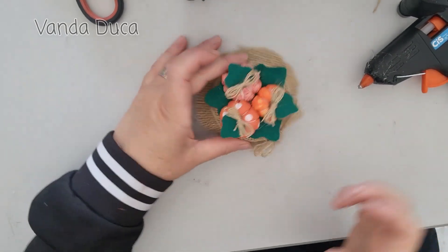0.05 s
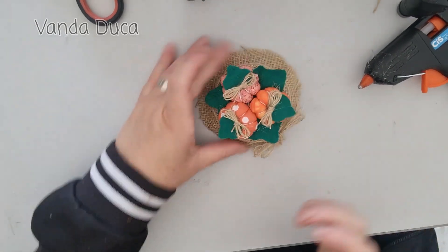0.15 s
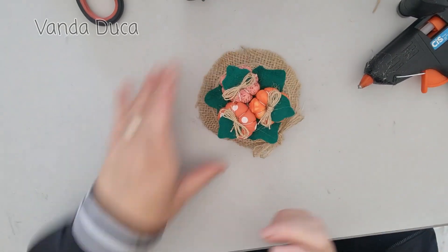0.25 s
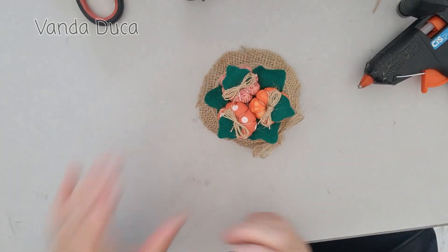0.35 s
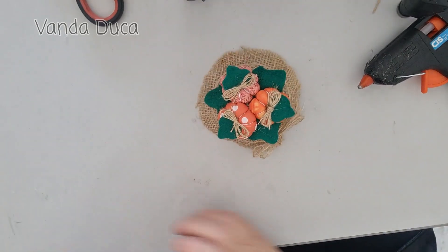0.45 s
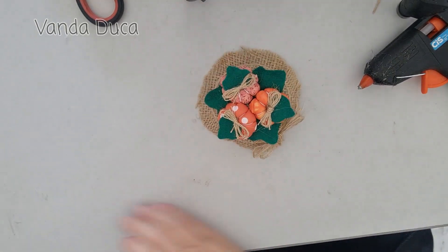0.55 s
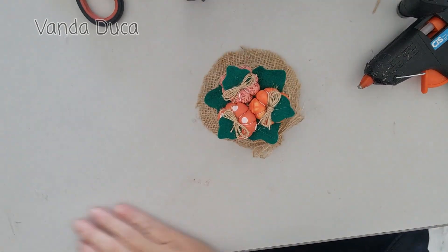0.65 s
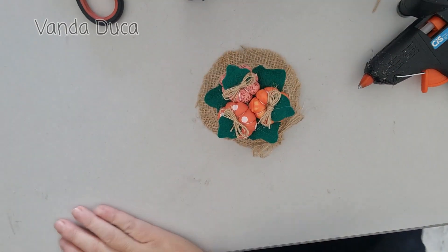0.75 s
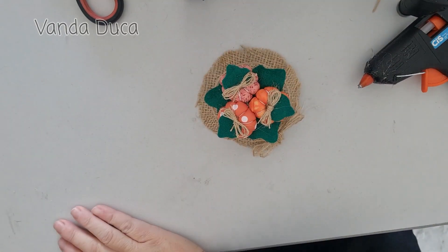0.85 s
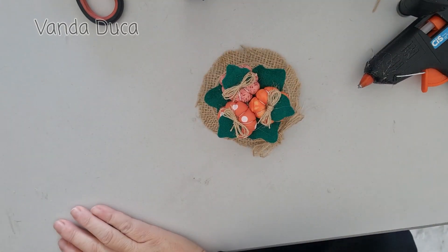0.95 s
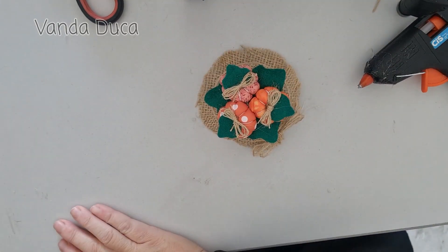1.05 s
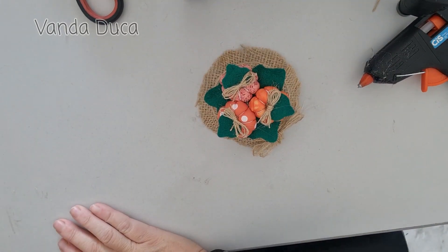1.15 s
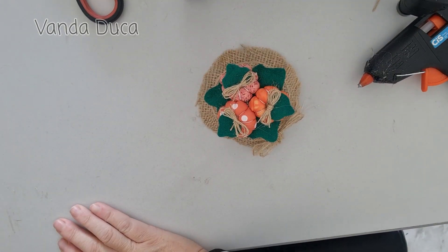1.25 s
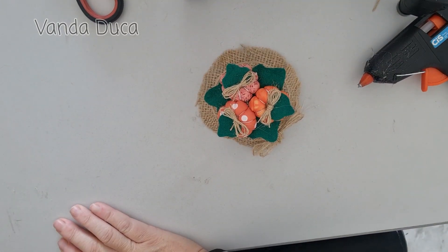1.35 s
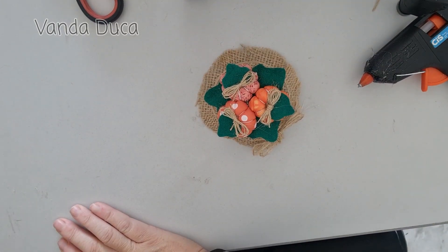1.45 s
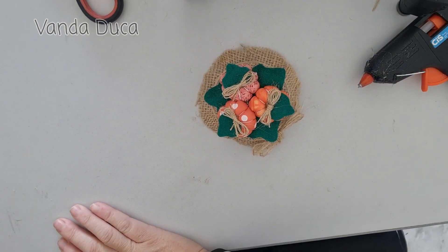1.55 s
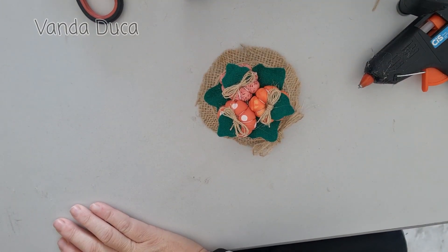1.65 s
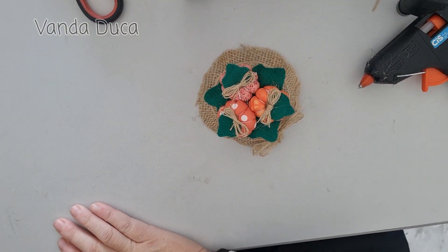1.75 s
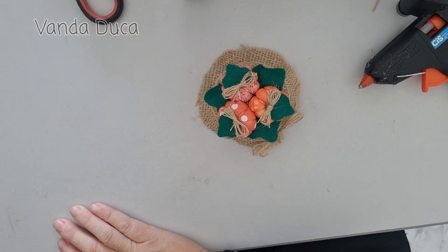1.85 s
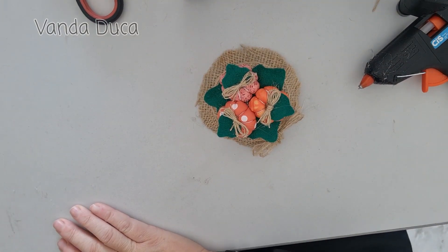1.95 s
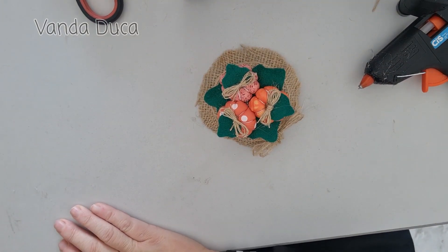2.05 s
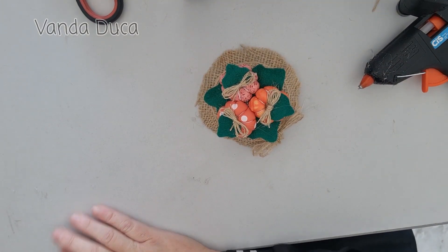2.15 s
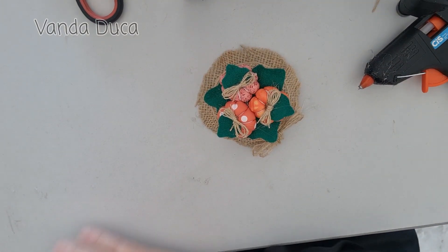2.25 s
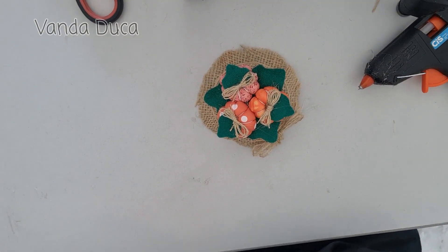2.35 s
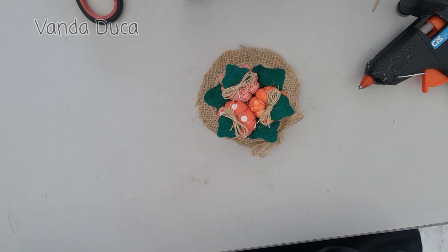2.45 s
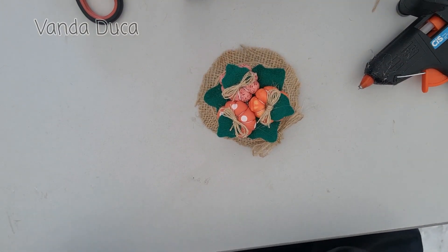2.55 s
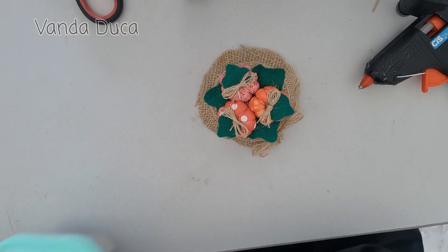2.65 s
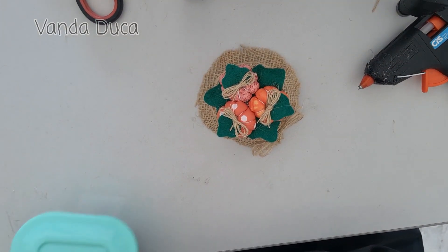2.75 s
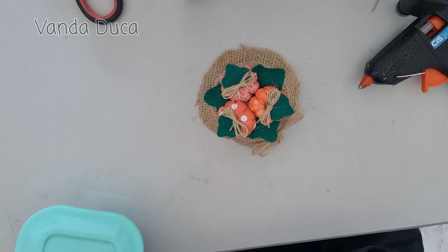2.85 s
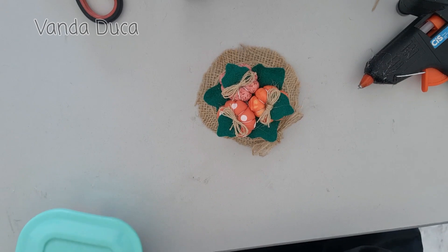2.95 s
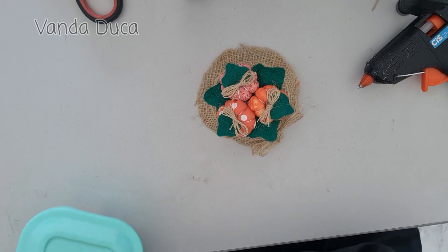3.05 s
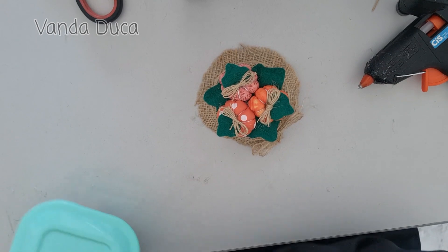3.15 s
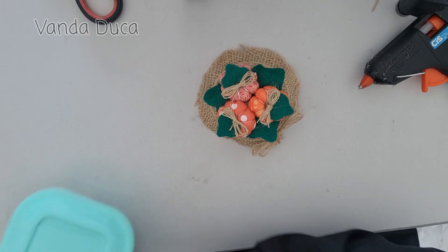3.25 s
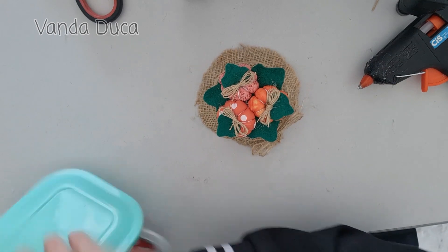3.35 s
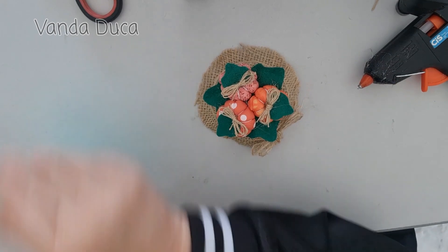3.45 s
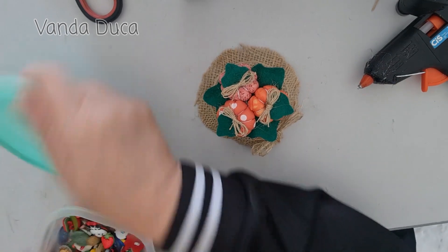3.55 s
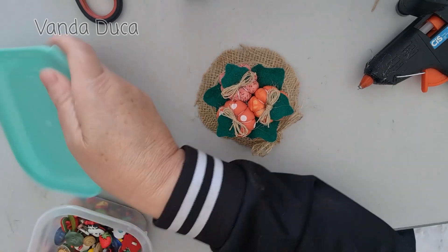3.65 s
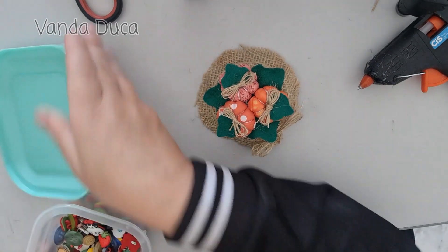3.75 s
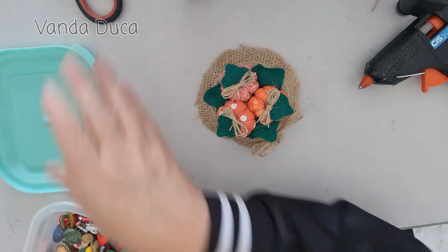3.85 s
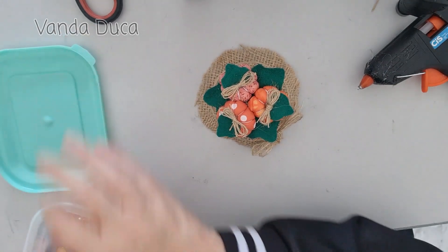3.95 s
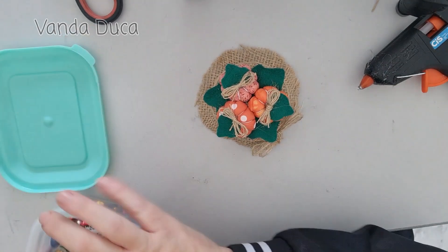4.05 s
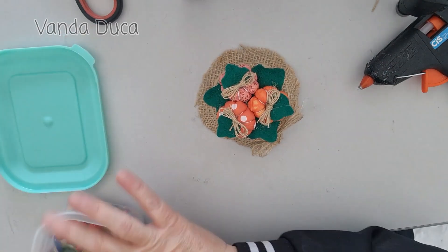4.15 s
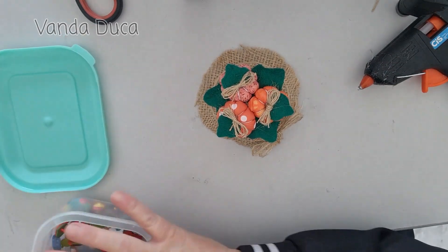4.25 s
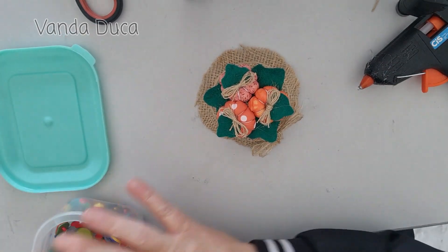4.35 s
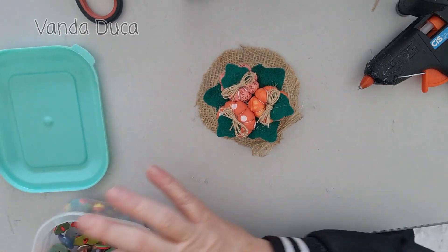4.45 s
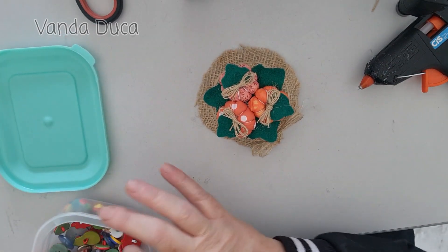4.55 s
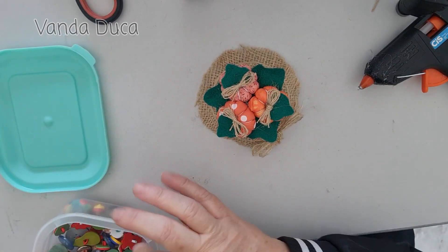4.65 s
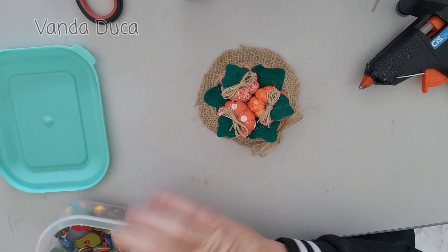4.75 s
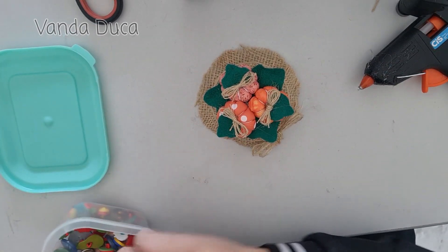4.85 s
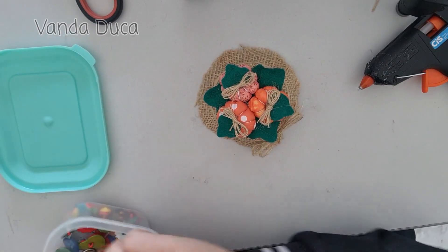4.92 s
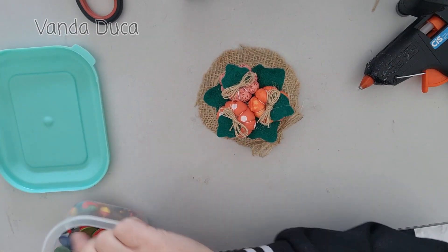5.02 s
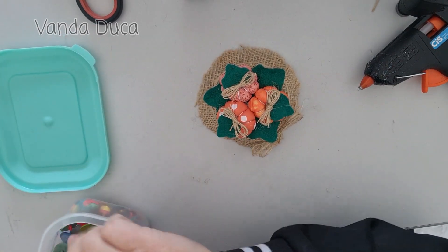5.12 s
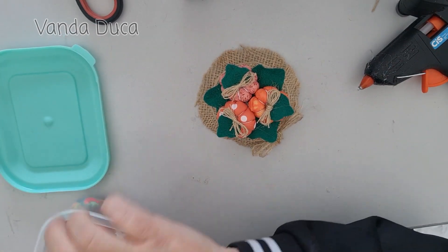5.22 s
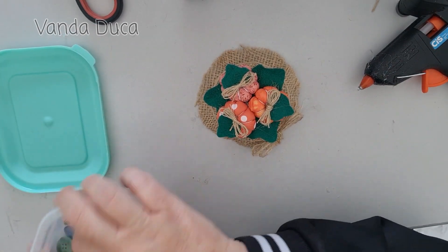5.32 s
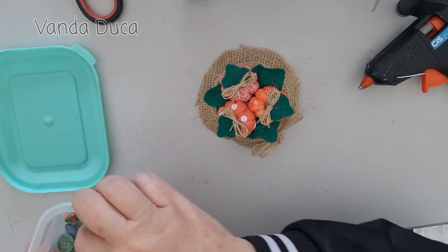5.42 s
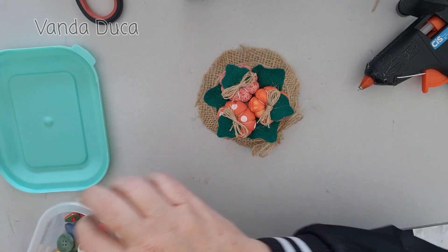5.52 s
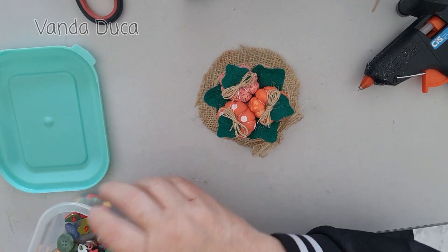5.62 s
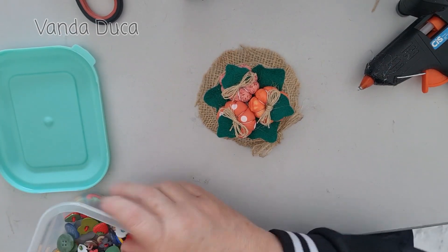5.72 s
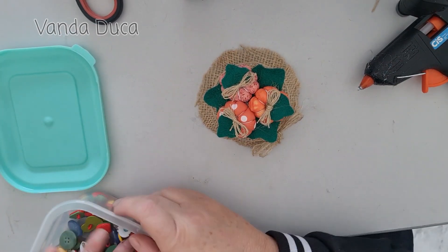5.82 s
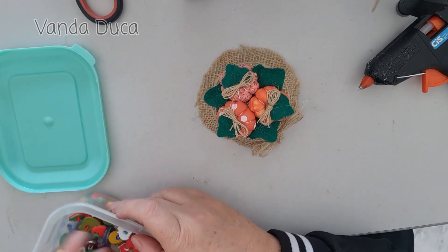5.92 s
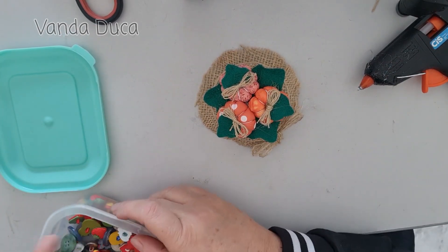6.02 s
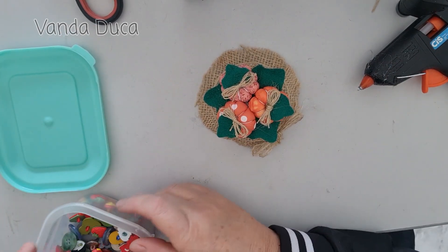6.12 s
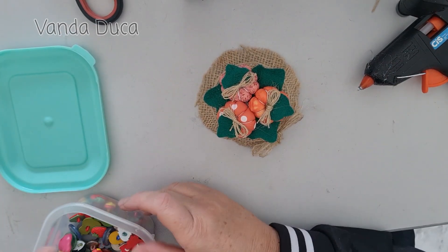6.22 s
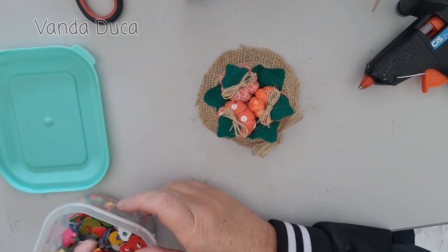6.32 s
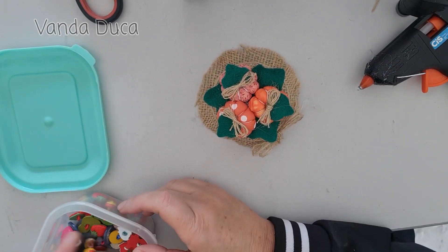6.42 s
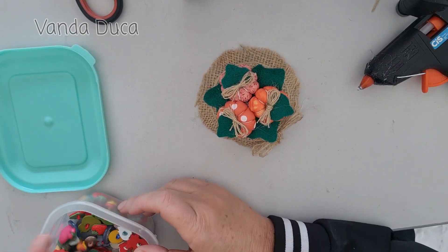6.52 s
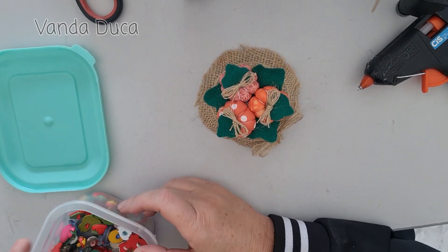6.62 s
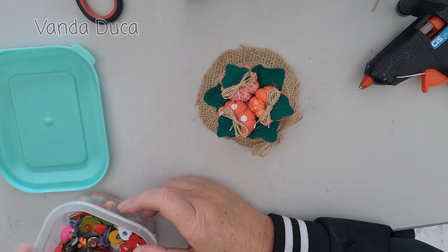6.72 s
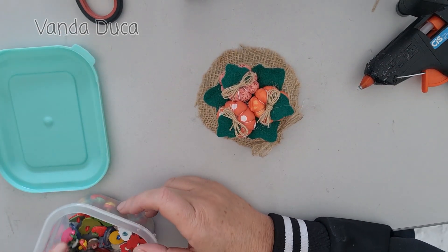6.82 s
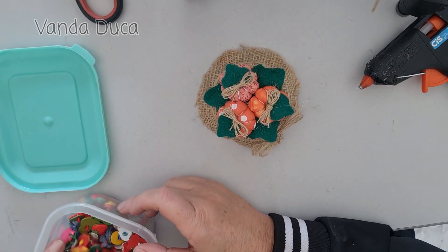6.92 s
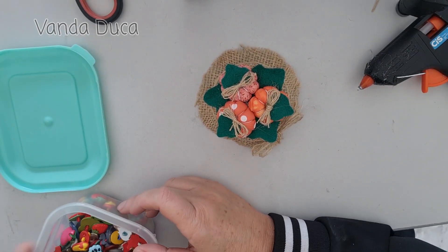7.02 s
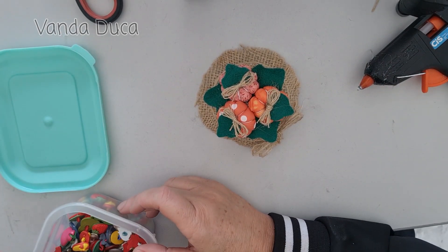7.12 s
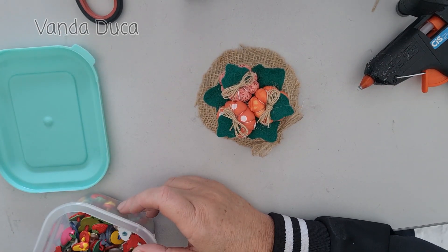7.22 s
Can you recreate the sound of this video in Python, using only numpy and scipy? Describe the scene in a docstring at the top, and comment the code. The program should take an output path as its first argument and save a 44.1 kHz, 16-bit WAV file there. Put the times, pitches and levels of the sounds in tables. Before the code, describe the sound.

Quiet room hum, then loose plastic buttons shift in a tub, the lid pops off loudly, and the buttons are stirred in bursts.

```python
"""Room noise and a distant traffic hum come first, then light far knocks and a sleeve brushing a table.
A plastic box of buttons is lifted, set down, and its tight lid pulled off and laid aside; fingers rummage.
Colliding buttons are random short decaying tones; snaps add a noise crack to a ring; the box is damped modes.
Hums and a low thud are wavering sines, cloth and room noise filtered noise; a small room answers by convolution."""
import sys
import numpy as np
from scipy import signal
from scipy.fft import rfft, irfft, next_fast_len
from scipy.io import wavfile
from scipy.ndimage import map_coordinates

SR = 44100
rng = np.random.default_rng(int(sys.argv[2]) if len(sys.argv) > 2 else 0)


def digitize_waveform(pressure):
    """Quantize a signal to 16-bit integers and store it at the path in sys.argv[1].

    Rows of a 2-D input are taken as channels; values are limited to [-1, 1].
    """
    field = np.atleast_2d(pressure).T
    bounded = np.clip(field, -1, 1)
    quanta = np.round(bounded * 32767).astype(np.int16)
    wavfile.write(sys.argv[1], SR, quanta)


N = 321048
TIME = np.arange(N) / SR
AGE = np.arange(SR // 4) / SR  # seconds since a strike


def amp(db):
    """Logarithmic level: decibels to amplitude gain."""
    return 10 ** (np.asarray(db) / 20)


def unit(x):
    """Power normalisation: scale to rms 1."""
    return x / np.sqrt(np.mean(x ** 2) + 1e-20)


def along(points, hz):
    """Logarithmic frequency scale: interpolate (frequency, value) points."""
    f, v = np.transpose(points)
    return np.interp(np.log(hz + 1), np.log(f + 1), v)


def wobble(rate, size=16384):
    """Slow random modulation: a smooth curve through rate random knots a second."""
    knots = rng.standard_normal(size)
    return map_coordinates(knots, [TIME * rate], order=2, mode="wrap")


def filtered(x, response):
    """Linear filtering: multiply the spectrum by a complex response of frequency."""
    m = next_fast_len(x.shape[-1] + SR // 4)
    spectrum = rfft(x, m) * response(np.fft.rfftfreq(m, 1 / SR))
    return irfft(spectrum, m)[..., :x.shape[-1]]


def coloured(x, points, size=2048):
    """Minimum-phase filtering: a causal response of given spectrum, so that attacks stay sharp."""
    cepstrum = irfft(np.log(amp(along(points, np.fft.rfftfreq(size, 1 / SR)))))
    # fold the cepstrum onto positive time
    cepstrum[1:size // 2] *= 2
    cepstrum[size // 2 + 1:] = 0
    kernel = irfft(np.exp(rfft(cepstrum)))
    kernel = kernel[None] / np.linalg.norm(kernel)
    return signal.oaconvolve(x, kernel, axes=1)[:, :x.shape[1]]


def add(track, s, sound):
    """Superposition: mix a sound in at time s."""
    part = track[:, round(s * SR):][:, :sound.shape[-1]]
    part += sound[..., :part.shape[1]]


def fade(t60):
    """Exponential damping: 60 dB lost in t60 seconds."""
    return np.exp(-np.log(1000) * AGE / t60)


def tone(hz):
    """Phase is the running sum of frequency: a sine of rms 1 on a steady or moving pitch."""
    phase = 2 * np.pi * np.cumsum(hz * np.ones(N)) / SR
    return np.sqrt(2) * np.sin(phase)


def ring(modes, scatter_db=-2.5):
    """Modal synthesis: damped modes of alternating sign, with levels scattered at each strike."""
    total = 0
    for k, (hz, db, t60) in enumerate(modes):
        level = amp(db + scatter_db * rng.normal())
        total = total + level * fade(t60) * np.sin(2 * np.pi * hz * AGE) * (-1) ** k
    return total


# room noise spectrum: pitch_hz [Hz], level_db [dB, relative]
QUIET_SPECTRUM = [(12, -25), (22, -2), (33, 3), (50, -6), (78, -0.5), (101, -6), (146, -5), (193, -6),
                  (228, -8), (301, -9.5), (328, -13), (422, -17), (459, -22.5), (513, -14.5), (1060, -22.5),
                  (3530, -30.5), (6300, -42), (16000, -53)]
# likeness of left and right noise: pitch_hz [Hz], correlation [0 to 1]
QUIET_LIKENESS = [(60, 0.88), (180, 0.96), (550, 0.52), (1650, 0.0014), (4970, 0), (15000, 0)]


def room_noise(level_db=-49):
    """Diffuse-field coherence: steady rumble and hiss, alike at both ears only at long wavelengths."""
    def mid_and_side(hz):
        turn = np.arccos(np.clip(along(QUIET_LIKENESS, hz), 0, 1)) / 2
        return amp(along(QUIET_SPECTRUM, hz)) * [np.cos(turn), np.sin(turn)]

    mid, side = filtered(rng.standard_normal((2, N)), mid_and_side)
    return amp(level_db) * unit(np.array([mid + side, mid - side]))


# faint high tones: start_s [s], end_s [s], mean pitch_hz [Hz], mean level_db [dB]
WHINE_TONES = [(0, 6.3, 8470, -93), (3.08, 3.37, 7200, -77)]


def whines():
    """Narrow-band tones: thin sines high in the hiss, unsteady in level and pitch."""
    total = 0
    for start, end, hz, db in WHINE_TONES:
        to_edge_s = np.minimum(TIME - start, end - TIME)
        heard = np.clip(to_edge_s / 0.05, 0, 1)
        level = amp(db + 2 * wobble(20))
        total = total + level * heard * tone(hz * (1 + 0.006 * wobble(160)))
    return total


# steady distant hums: mean pitch_hz [Hz], level_db [dB, before the common gain]
STEADY_HUMS = [(139.7, -60.5), (66.6, -56)]
# hums that swell and fade; the last two rows are a low thud and its second harmonic:
# peak_s [s], half_length_s [s], mean pitch_hz [Hz], glide_hz to either side [Hz],
# level_db at the peak [dB, before the common gain]
SWELLING_HUMS = [(0.348, 0.273, 150, 19, -54), (1.498, 0.3, 142.4, 7, -51), (4.85, 0.35, 292, 4, -57.5),
                 (5.78, 0.18, 222, -4, -51.5), (7.1, 0.2, 186, 1, -54), (7.25, 0.044, 141, 1, -47),
                 (7.27, 0.05, 70.4, 0.5, -34.5)]


def traffic(level_db=0.5, waver=0.01186, fading=0.7, fading_per_s=13):
    """Amplitude and frequency modulation: wavering, broken hums, steady or swelling, and a low thud."""
    def note(hz):
        broken = 1 + fading * wobble(fading_per_s)
        return broken * tone(hz * (1 + waver * wobble(25)))

    hum = sum(amp(db) * note(hz) for hz, db in STEADY_HUMS)
    for s, half_s, hz, glide_hz, db in SWELLING_HUMS:
        offset = (TIME - s) / half_s
        spread = np.hypot(1, offset)  # 1 at the peak, growing to either side
        hum = hum + amp(db) / spread * note(hz + glide_hz * offset / spread)
    return amp(level_db) * hum


# spectrum of one hard contact: pitch_hz [Hz], level_db [dB, relative]
CONTACT_SPECTRUM = [(150, -4.5), (500, -2.5), (1000, -1), (1600, -5.5), (3300, 1), (5000, -5), (7000, -6.5),
                    (10000, -11), (15000, -17)]


def contact(hz, crack_t60, ring_t60, ring_db, apart, rise=0.00031, size=4096):
    """Impact excitation: a crack, partly different at each ear, and a ring; mean energy 1 per ear."""
    noise = rng.standard_normal((3, size))
    at_ears = noise[0] + apart * noise[1:]
    crack = coloured(at_ears * fade(crack_t60)[:size], CONTACT_SPECTRUM)
    # the button that is struck rings too, lower and a little weaker
    neighbour_hz = hz * rng.uniform(0.68, 0.88)
    modes = np.sin(2 * np.pi * hz * AGE) + 0.75 * np.sin(2 * np.pi * neighbour_hz * AGE)
    ringing = (modes * fade(ring_t60))[:size]
    onset = 1 - np.exp(-AGE[:size] / rise)
    return unit(unit(onset * crack) + amp(ring_db) * unit(onset * ringing)) / np.sqrt(size)


# light knocks across the room: start_s [s], level_db [dB]
FAR_KNOCK_TIMES = [(0.714, -25), (0.765, -37.5), (0.794, -40.5)]
# their spectrum: pitch_hz [Hz], level_db [dB, relative]
FAR_KNOCK_SPECTRUM = [(150, -12), (330, -1), (450, 11), (600, -1), (770, 4), (1000, -7), (1370, 0),
                      (1650, -10), (1900, -11), (2600, -17), (3500, -14), (7000, -28), (14000, -42)]
# small far ticks: start_s [s], level_db [dB], pitch_hz [Hz]
FAR_TICK_TIMES = [(1.18, -23.5, 4420)]


def far_knocks(t60=0.041):
    """Filtered impulsive noise: light knocks and a tick further off, made to be heard through the room."""
    track = np.zeros((2, N))
    for s, db in FAR_KNOCK_TIMES:
        burst = rng.standard_normal((1, len(AGE))) * fade(t60)
        add(track, s, amp(db) * coloured(burst, FAR_KNOCK_SPECTRUM))
    for s, db, hz in FAR_TICK_TIMES:
        tick = contact(hz, crack_t60=0.16, ring_t60=0.025, ring_db=-11, apart=0.5)
        add(track, s, amp(db) * tick)
    return track


# level curve of the rubbing sleeve: start_s [s], level_db [dB, before the common gain]
SLEEVE_LEVEL = [(1.62, -77), (1.7, -56), (1.75, -57), (1.82, -37.5), (1.9, -55.5), (2.15, -56)]
# spectrum of rubbed cloth: pitch_hz [Hz], level_db [dB, relative]
CLOTH_SPECTRUM = [(200, -22), (290, 3), (350, 31), (430, 5), (750, 3.5), (1200, -6), (2500, -1.5),
                  (12000, -28)]


def sleeve(level_db=-5):
    """Friction noise: cloth brushes unevenly over the table top."""
    rub = coloured(rng.standard_normal((1, N)), CLOTH_SPECTRUM) * amp(wobble(40.5))
    s, db = np.transpose(SLEEVE_LEVEL)
    stroke = amp(np.interp(TIME, s, db, left=-150, right=-150))
    return amp(level_db) * stroke * unit(rub)


# modes of the tight rim: pitch_hz [Hz], level_db [dB, relative], t60_s [s]
RIM_MODES = [(570, -1, .024), (665, 0, .02), (800, -4, .02), (1180, -16, .02), (1520, -18, .022)]


def creak(count=4, start_s=3.186, level_db=-16, slip_loss_db=10, gap_s=0.009, gap_growth=1.63):
    """Stick-slip: the tight lid gives way in slips that slow down; the first is the strongest."""
    track = np.zeros((2, N))
    for k in range(count):
        s = start_s + gap_s * np.sum(gap_growth ** np.arange(k))
        add(track, s, amp(level_db - slip_loss_db * (k > 0)) * ring(RIM_MODES, 0.78))
    return track


# modes of the box walls: pitch_hz [Hz], level_db [dB, relative], t60_s [s]
WALL_MODES = [(440, -5, 0.021), (600, -15, 0.024), (662, -2, 0.036), (810, 5, 0.0071), (1047, -1, 0.052),
              (1120, -1.5, 0.024), (1270, -0.5, 0.026), (1510, -14, 0.018), (1917, -3, 0.03)]
# modes of the box floor: pitch_hz [Hz], level_db [dB, relative], t60_s [s]
FLOOR_MODES = [(265, 0.5, 0.13), (415, 0, 0.07), (538, -6, 0.08)]


def blow(hz, wall_db, boom_db, crack_db, thock_t60=0.021, rise=0.0006, dent_db=3):
    """Modal excitation: a dead thock dents the box, rings its walls and floor, and cracks at the rim."""
    thock = fade(thock_t60) * np.sin(2 * np.pi * hz * AGE)
    walls = amp(wall_db) * ring(WALL_MODES)
    floor = amp(boom_db) * ring(FLOOR_MODES, 1.0)
    body = amp(dent_db) * thock + walls + floor
    sound = np.tile(body * (1 - np.exp(-AGE / rise)), (2, 1))
    crack = contact(1280, crack_t60=0.015, ring_t60=0.047, ring_db=-44.0, apart=0.95)
    add(sound, 0, amp(crack_db) * 6 * crack)
    return sound


# blows on the box: start_s [s], level_db [dB], thock pitch_hz [Hz],
# boom_db [dB, gain of the floor modes], crack_db [dB, gain before a sixfold boost]
BOX_BLOWS = [(2.503, -29.5, 710, -38, -23), (2.652, -24.5, 637, -22, 5.5), (2.867, -14, 715, -4.5, -3.5),
             (2.939, -27.5, 400, -33, -7), (3.042, -35, 610, -30, -10), (3.3935, -12, 684, -39.5, 0.5),
             (3.398, -12.5, 552, -17, -12), (3.4032, -3.5, 625, -42, -6.5), (3.653, -29, 756, -14.5, -23),
             (3.864, -28.5, 990, -39, -10), (3.953, -22, 893, -27.5, 4), (4.413, -22.5, 646, -26, -16),
             (5.946, -25.5, 840, -16, -1.5), (6.109, -22.5, 810, -32, -3), (6.175, -26, 790, -16, -6)]
# the lid flexes: start_s [s], level_db [dB]
LID_FLEXES = [(2.646, -30.5), (3.95, -22), (4.008, -36)]
# modes of the loose lid: pitch_hz [Hz], level_db [dB, relative], t60_s [s]
LID_MODES = [(355, -2, .055), (395, 0, 0.09), (700, -13, .04), (917, -7, .045), (1936, -10, .04),
             (3600, -3, .018)]


def knocks(wall_db=-15):
    """Struck plates: the box is set down, snapped open and bumped; the loose lid rings as it flexes."""
    track = np.zeros((2, N))
    for s, db, hz, boom_db, crack_db in BOX_BLOWS:
        add(track, s, amp(db) * blow(hz, wall_db, boom_db, crack_db))
    for s, db in LID_FLEXES:
        add(track, s, amp(db) * ring(LID_MODES))
    return track


# snaps of single buttons on a neighbour or the wall, and near 3.19 s sharp cracks as the lid slips: # start_s
# [s], level_db [dB, before the common gain], ring pitch_hz [Hz], ring_db against the crack [dB]
SNAPS = [(2.322, -21.5, 2710, 4.5), (2.368, -33, 1980, 18), (2.3925, -26, 3260, 0),
         (2.504, -29, 2920, 2), (2.5822, -23.5, 2980, -2), (2.641, -18.5, 3200, -2),
         (2.6475, -16, 3350, -15), (2.7006, -22, 3230, 8), (2.8825, -24, 2960, -17),
         (2.9302, -19.5, 1940, 8), (3.187, -21.5, 2970, 4), (3.1939, -26.5, 2870, -2),
         (3.3905, -23, 5500, 11), (3.5298, -23, 2920, 6), (3.6167, -22.5, 2430, 16),
         (3.6512, -28, 2900, 8), (3.668, -29, 3560, -5), (3.8644, -12.5, 3400, -3),
         (3.912, -16, 3000, 7.5), (3.9295, -13.5, 3160, -8), (3.9493, -6, 3050, -16),
         (3.9555, -4.5, 3670, 4), (3.986, -23, 3400, 0), (4.0082, -27, 3440, 5),
         (4.0375, -21, 3230, 9), (4.06, -34, 3100, 3), (4.2467, -21.5, 4300, -9),
         (4.2597, -13, 2870, 5.5), (4.3205, -15.5, 3900, -10), (4.325, -10, 3250, 12),
         (4.338, -12, 3140, 3), (4.365, -17, 3320, 5), (4.3935, -13.5, 3860, 7),
         (4.398, -14, 4100, 9), (4.412, -17, 3570, -2), (4.467, -26.5, 2880, 3),
         (4.484, -27, 3800, 6), (4.532, -27.5, 2820, 3), (4.5944, -25.5, 4050, 6.5),
         (4.614, -38, 4220, 9), (5.037, -28, 2920, 10), (5.065, -24, 3330, 1),
         (5.0773, -19.5, 3320, -9), (5.103, -17.5, 3220, 3), (5.117, -20, 1730, 15),
         (5.227, -34, 3980, 1), (5.6541, -31.5, 4900, -6), (5.9451, -13.5, 2620, -3),
         (5.998, -17.5, 3760, 3), (6.0407, -14, 4840, 6), (6.044, -15, 4660, 3),
         (6.0503, -13.5, 3920, 15), (6.094, -16, 3900, 3), (6.1095, -15.5, 2100, 7),
         (6.117, -19, 3000, -11), (6.193, -26, 3530, 10), (6.204, -12, 5110, 0.5),
         (6.213, -21.5, 4500, -9), (6.281, -33.5, 2240, -19), (6.4485, -23, 3930, -6),
         (6.465, -16.5, 3820, -2), (6.472, -21, 5100, 2), (6.478, -14.5, 3830, 0),
         (6.527, -16, 5300, -2), (6.6286, -23, 3550, 4), (6.646, -17.5, 1860, 0.5),
         (6.7252, -14, 3700, 7), (6.746, -31, 3370, -10), (6.773, -25, 4720, -3),
         (6.947, -21, 4100, 2.5), (6.9856, -21, 4360, -9), (6.996, -10.5, 4530, 0),
         (7.021, -11.5, 4020, 0), (7.0312, -11, 4360, 4), (7.045, -15, 3730, 3),
         (7.111, -21.5, 4470, -3), (7.136, -23.5, 5470, 1), (7.1468, -31, 3470, -11),
         (7.1909, -27, 1710, 1), (7.247, -30.5, 2960, 4)]


def clicks(level_db=8, apart=0.95, rebound_s=0.0082, rebound_db=-26.5):
    """Impact and rebound: sharp single contacts strike once more; freer buttons ring more."""
    track = np.zeros((2, N))
    for s, db, hz, free_db in SNAPS:
        rebound = (rebound_s * rng.uniform(0.93, 1.2), rebound_db)
        for delay, loss_db in ((0, 0), rebound):
            snap = contact(hz, crack_t60=0.008, ring_t60=0.009, ring_db=free_db, apart=apart)
            add(track, s + delay, amp(db + level_db + loss_db) * snap)
    return track


# pushes by the box or the fingers: start_s at full strength [s], length_s [s], level_db [dB],
# walls_db and edges_db for wall knocking and edge scraping [dB, relative to level_db]
HEAP_PUSHES = [(2.299, 0.097, -49.5, 8, -17), (2.489, .02, -54, 12.5, -16), (2.605, 0.016, -46, 6, -6),
               (2.624, 0.22, -43, 7.5, -17), (2.634, 0.027, -38, -7, -2), (2.694, 0.033, -42, 11, -20),
               (2.865, 0.019, -35.5, 15, -11), (2.922, 0.013, -42, 10, -18), (3.153, .012, -55.5, 10, -5),
               (3.171, 0.012, -45, 21, -13), (3.391, 0.025, -29, 8, -6.5), (3.52, 0.021, -34.5, 2, -19),
               (3.605, 0.0091, -49.5, -4, -28), (3.653, 0.015, -39.5, 0, -24), (3.98, 0.06, -46, 9.5, -22),
               (4.248, 0.0079, -30.5, -27, -3.5), (4.263, 0.056, -35.5, -17, -11),
               (4.319, 0.024, -30, -9, -5), (4.347, 0.071, -32.5, -4, -12), (4.447, 0.023, -44, 3, -14),
               (4.521, 0.045, -49, 5.5, -30), (5.061, 0.041, -33, -9, -10.5), (5.938, 0.0073, -33, -4, -7),
               (5.958, 0.019, -42, -3, -17), (5.995, 0.012, -37.5, -5, -6), (6.016, 0.05, -33.5, -1, -6.5),
               (6.025, 0.026, -36, -8, -1.5), (6.1, 0.036, -32.5, 5, -12), (6.173, 0.034, -42.5, 13.5, -10),
               (6.462, 0.012, -35, 6, 0), (6.524, 0.08, -37, 0, -8.5), (6.63, .052, -40, 6.5, -14),
               (6.935, 0.13, -39, 2, -6), (6.983, 0.042, -31.5, -10, -1.5), (7.011, 0.031, -31.5, -4, -4.5),
               (7.109, 0.054, -47, 13, -15)]


def stirring(rise_db_per_s=2377, sag_db_per_s=28, settle_db_per_s=417):
    """Power addition: each push takes hold, sags while it lasts and settles; returns heap, walls, edges."""
    heap, walls, edges = np.zeros((3, N))
    for s, length, db, wall_db, edge_db in HEAP_PUSHES:
        near = slice(round((s - 0.1) * SR), round((s + length + 0.5) * SR))
        age = TIME[near] - s
        fall_db = rise_db_per_s * np.maximum(-age, 0)
        fall_db += sag_db_per_s * np.clip(age, 0, length)
        fall_db += settle_db_per_s * np.maximum(age - length, 0)
        power = amp(db - fall_db) ** 2
        heap[near] += power
        walls[near] += power * amp(wall_db) ** 2
        edges[near] += power * amp(edge_db) ** 2
    return np.sqrt([heap, walls, edges])


def grains(density, hz, pitch_spread, t60, spread_db, count=30000, size=640):
    """Poisson-like collisions, density a second, each with its own pitch, strength, damping and direction."""
    when, chance = rng.integers(0, N, count), rng.random(count)
    traits = rng.standard_normal((count, 4))
    happens = chance < density[when] * N / SR / count
    pitch, strength, damping, direction = np.clip(traits[happens], -2, 2).T[..., None]
    age = AGE[:size]
    own_t60 = t60 * np.exp(0.4 * damping)
    decay = amp(spread_db * strength) * np.exp(-np.log(1000) * age / own_t60)
    phase = 2 * np.pi * hz * np.exp(pitch_spread * pitch) * age
    place = (when[happens, None] + np.arange(size)).ravel()
    ears = []
    for side in (1, -1):  # direction sets the phase between the ears
        wave = decay * np.cos(phase + side * direction / 2)
        ears.append(np.bincount(place, wave.ravel(), N)[:N])
    return np.array(ears) / np.sqrt(density)  # keeps the level independent of density


# spectra: pitch_hz [Hz], level_db [dB, relative]; buttons in the box, scraping edges, the wall under a button
HEAP_SPECTRUM = [(120, -26), (330, -2), (520, 8), (700, 9), (810, 14), (1050, 2.5), (1800, 7.5), (2300, 9),
                 (3300, 0.5), (4900, 1.5), (6800, -4), (9200, -10.5), (12000, -4), (15000, -32)]
EDGE_SPECTRUM = [(1500, -29), (4000, 3), (6500, -1), (9500, -6.5), (13000, -4.5), (15000, -24)]
WALL_TAP_SPECTRUM = [(150, -15.5), (380, -1.5), (520, 0.5), (680, -2), (815, -4), (1000, -11),
                     (2500, -11.5), (8000, -19)]


def rummage(rate=2100, idle_rate=450, tick_db=-2.5, clack_db=-4, wall_db=-12):
    """Granular collisions: stirred buttons tick and clack oftener and louder, scrape, and tap the walls."""
    effort, on_walls, scraping = stirring()
    density = rate * np.sqrt(effort / effort.max()) + idle_rate  # collisions a second
    ticks = grains(density, hz=4560, pitch_spread=0.83, t60=0.00042, spread_db=3.0, size=64)
    clacks = grains(density * 0.25, hz=3400, pitch_spread=0.35, t60=0.006, spread_db=3)
    scrapes = grains(density, hz=9300, pitch_spread=0.31, t60=0.00045, spread_db=2.5, size=64)
    taps = grains(np.full(N, 650), hz=676, pitch_spread=0.44, t60=0.0097, spread_db=2)
    ticks = amp(tick_db) * unit(coloured(ticks, HEAP_SPECTRUM))
    clacks = amp(clack_db) * unit(coloured(clacks, CONTACT_SPECTRUM))
    scrapes = unit(coloured(scrapes, EDGE_SPECTRUM))
    taps = amp(wall_db) * unit(coloured(taps, WALL_TAP_SPECTRUM))
    slips = amp(1.7 * wobble(130))  # the heap gives way unevenly
    return slips * (effort * (ticks + clacks) + scraping * scrapes + on_walls * taps)


# treble and bass at the left: pitch_hz [Hz], left minus right level_db [dB]
LEFT_BIAS = [(200, -2), (600, -3), (1100, 0.5), (3000, 5.5), (12000, 2.5)]


def from_left(x, lead=0.0002116):
    """Interaural differences: sound reaches the left microphone first, and with more treble."""
    ears = np.array([[0.5], [-0.5]])  # each ear takes half the difference

    def response(hz):
        return amp(ears * along(LEFT_BIAS, hz)) * np.exp(2j * np.pi * hz * lead * ears)

    return filtered(x, response)


# room decay: pitch_hz [Hz], t60_s [s]
ROOM_DECAY = [(150, 0.35), (600, 0.54), (2500, 0.47), (4000, 0.35), (6000, 0.32), (14000, 0.084)]
# room level: pitch_hz [Hz], level_db [dB]
ROOM_LEVEL = [(200, -1.5), (450, -5.5), (720, -4), (1500, -1.5), (4000, -4), (8000, -5.5), (15000, -1.5)]
# long waves reach both ears alike: pitch_hz [Hz], side level_db [dB]
ROOM_SIDE = [(150, -19), (280, -12), (600, -8.5), (1000, 3), (3000, 0)]


def room(x, early_db=5, early_t60=0.041, gap=0.0033, count=4):
    """Reverberant decay: near surfaces answer first, then the room dies away."""
    wet = np.zeros((2, N))
    for k in range(count):
        hz, t, z = signal.stft(rng.standard_normal((2, SR // 2)), SR, nperseg=256)
        late = np.exp(-np.log(1000) * t / along(ROOM_DECAY, hz)[:, None])
        early = amp(early_db) * np.exp(-np.log(1000) * t / early_t60)
        decay = late + early
        decay /= np.linalg.norm(decay, axis=1, keepdims=True)
        tail = signal.istft(z * decay, SR, nperseg=256)[1]
        tail /= np.linalg.norm(tail[0])
        # several random echo tails cross-fade at a fixed two rounds a second,
        # which evens out the reverberation
        share = np.clip(np.cos(2 * np.pi * (2 * TIME + k / count)), 0, 1)
        wet += signal.oaconvolve(x * share, tail, axes=1)[:, :N]
    mid = wet.mean(axis=0)
    side = filtered((wet[0] - wet[1]) / 2, lambda hz: amp(along(ROOM_SIDE, hz)))

    def delayed_level(hz):
        return amp(along(ROOM_LEVEL, hz)) * np.exp(-2j * np.pi * hz * gap)

    return filtered(np.array([mid + side, mid - side]), delayed_level)


def scene():
    """Superposition of direct sound, reverberation and background."""
    background = room_noise() + whines() + traffic()
    table = sleeve() + creak() + knocks() + clicks() + rummage()
    return background + room(table + far_knocks()) + from_left(table)


def record(dry):
    """Band limitation: the recorder clips at full scale and keeps nothing above its top frequency."""
    top_hz, slope_hz = 16300, 900
    return filtered(np.clip(dry, -1, 1), lambda hz: np.clip((top_hz - hz) / slope_hz, 0, 1) ** 2)


dry = scene()
out = record(dry)
digitize_waveform(out)
```